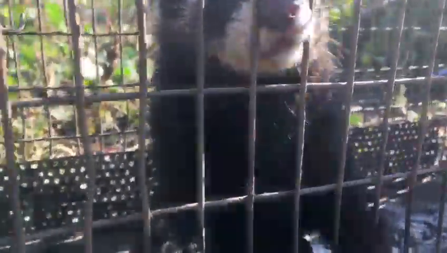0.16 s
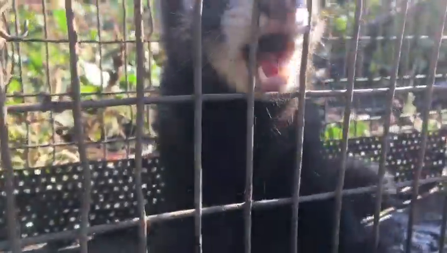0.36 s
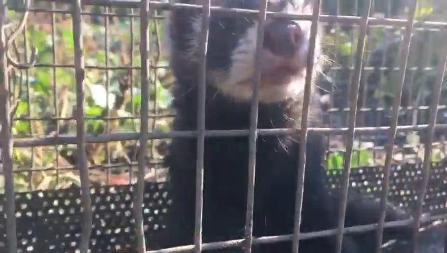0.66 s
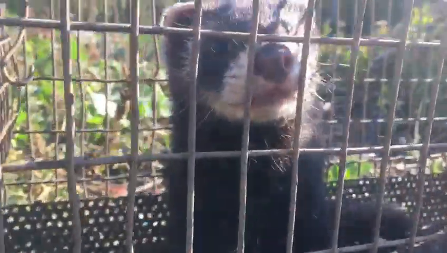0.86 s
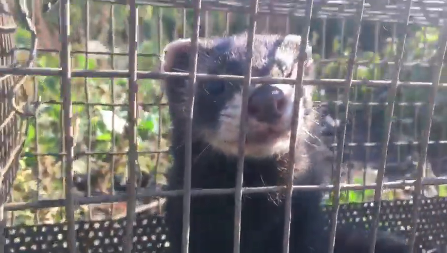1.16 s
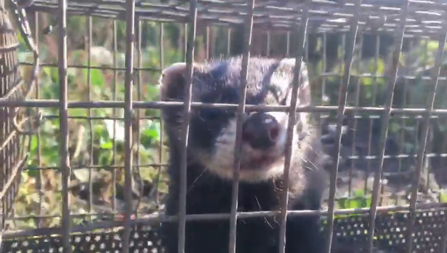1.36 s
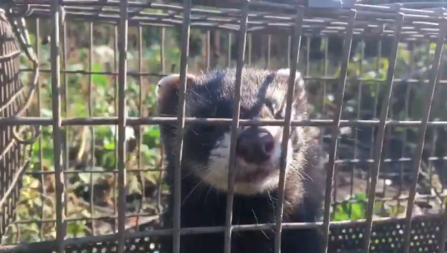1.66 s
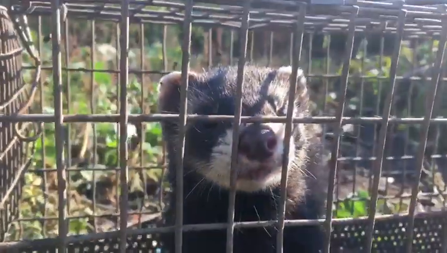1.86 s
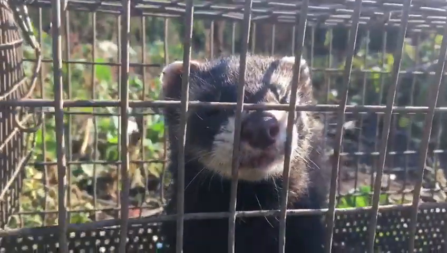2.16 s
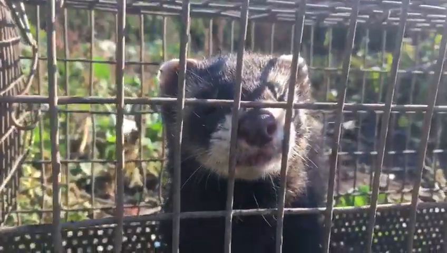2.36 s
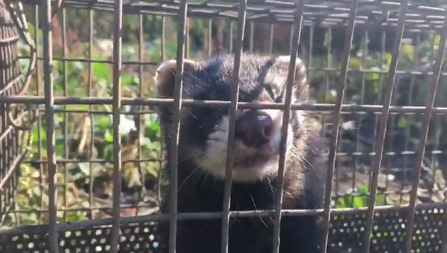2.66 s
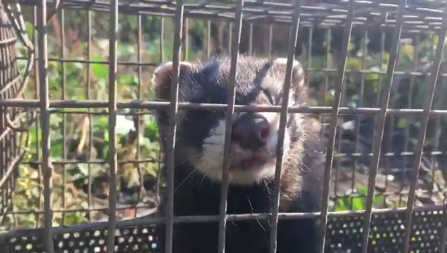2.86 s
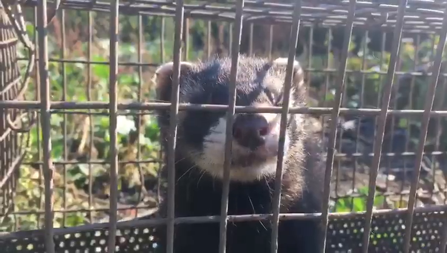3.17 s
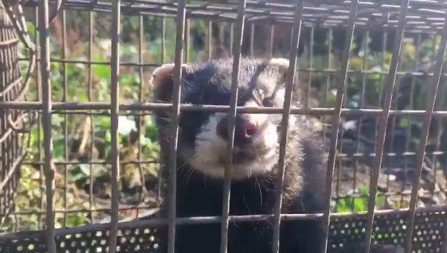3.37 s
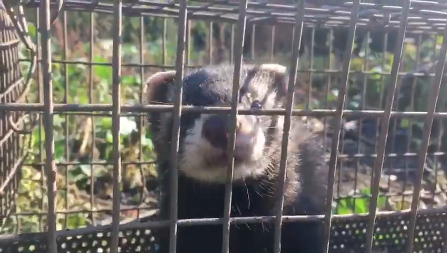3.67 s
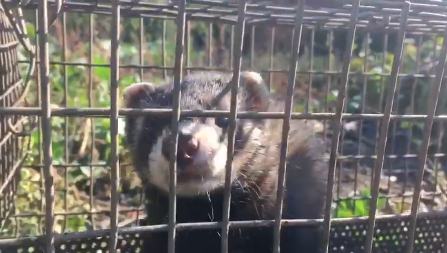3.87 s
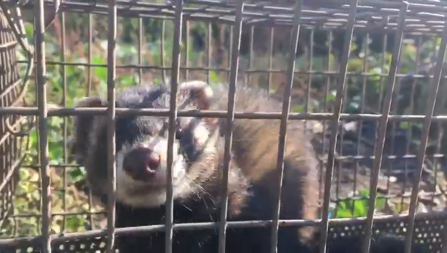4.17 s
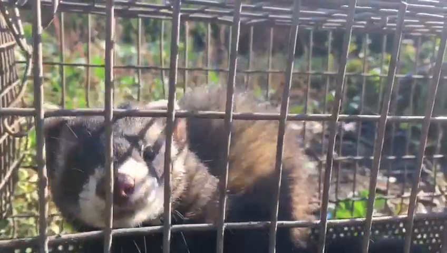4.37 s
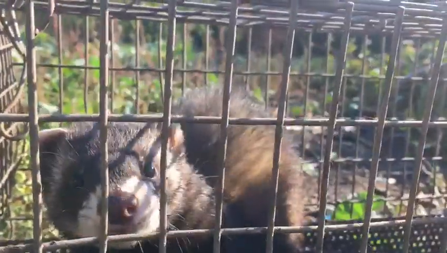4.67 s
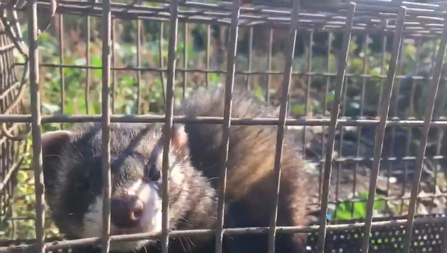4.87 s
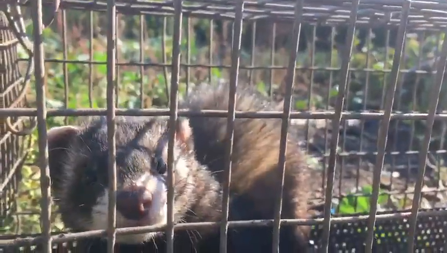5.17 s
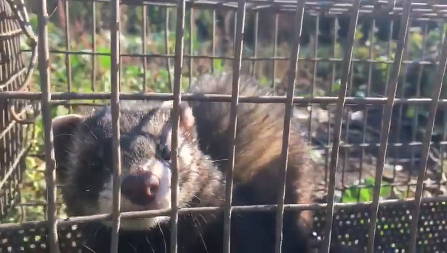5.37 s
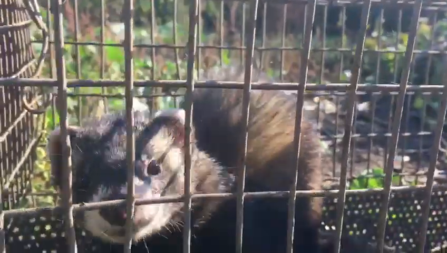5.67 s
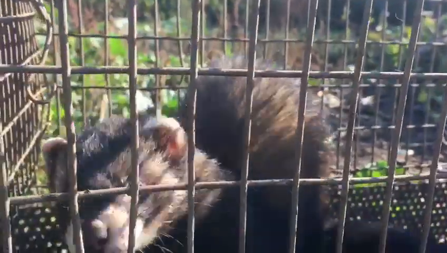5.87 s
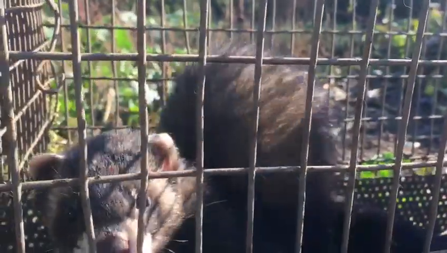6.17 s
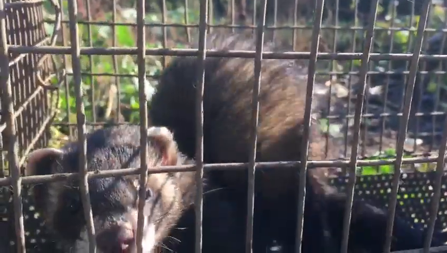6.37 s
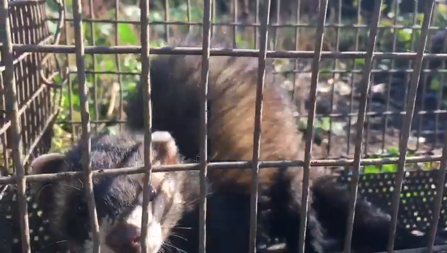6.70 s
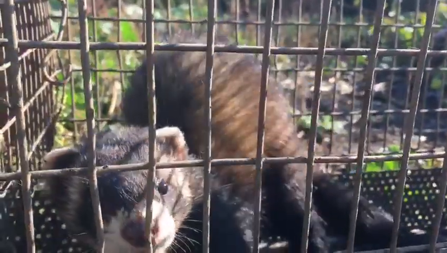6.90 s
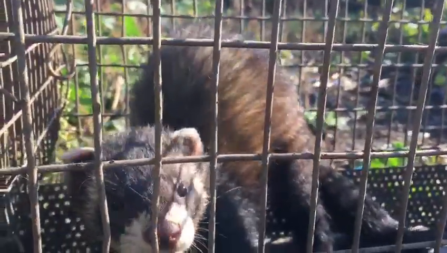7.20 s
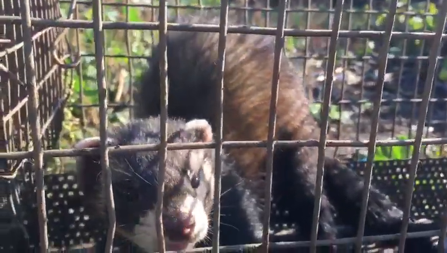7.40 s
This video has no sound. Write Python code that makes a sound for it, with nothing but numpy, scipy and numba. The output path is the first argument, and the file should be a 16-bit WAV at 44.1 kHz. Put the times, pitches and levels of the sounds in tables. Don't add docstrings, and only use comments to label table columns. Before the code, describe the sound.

Claws tick on mesh, two explosive spits burst near the microphone, far dogs woof and whine across a yard, and a long steady hiss ends it.

```python
import sys
import numpy as np
from scipy import signal
from scipy.fft import rfft, irfft
from scipy.io import wavfile
from scipy.ndimage import map_coordinates
from numba import njit

SR = 44100
rng = np.random.default_rng(int(sys.argv[2]) if len(sys.argv) > 2 else 0)


def materialize(psi):
    bounded = np.clip(np.atleast_2d(psi).T, -1, 1)
    quanta = np.round(bounded * 32767).astype(np.int16)
    wavfile.write(sys.argv[1], SR, quanta)


def linear_from_db(decibels):
    return 10 ** (np.asarray(decibels, float) / 20)


N = 332514

# f/Hz, density/dB
WIND_SPECTRUM = [(8.8, -52.5), (15, -24), (36, -5), (75, -2), (237, -5.5), (286, -10), (327, -34.5),
                 (500, -26.5), (650, -55), (1100, -120)]
HUM_SPECTRUM = [(120, -29), (200, -10), (264, -12), (332, -11.5), (540, -12.5), (752, -19), (1540, -24),
                (2220, -29), (11000, -32.5), (12900, -47), (16800, -78), (22000, -120)]
WIND_DB, HUM_DB = -60.5, -77.5
# peak t/s, rise/s, fade/s, level/dB
GUSTS = [
    (.4, 0.19, 0.149, -49.5),
    (1.59, 0.27, 0.21, -71),
    (2.052, .8, 0.64, -57.5),
    (4.3, 1.5, 1.26, -62.5),
    (4.66, 0.56, 0.31, -62),
    (5.92, 1.5, 1.2, -71),
]
# peak t/s, rise/s, fade/s, level/dB
RUSTLE = [
    (0.2356, 0.18, 0.16, -62),
]
DUCK_FROM_S, DUCKED_S, BACK_S = 0.35, 0.72, 1.99
WIND_DUCK_DB, HUM_DUCK_DB = -29.5, -13

# t/s, length/s, from f/Hz, to f/Hz, level/dB
CHIRPS = [
    (2.24, 0.032, 3370, 1935, -44.5),
    (2.324, 0.024, 3210, 2595, -62),
    (2.756, 0.021, 3394, 3130, -64),
    (4.709, 0.024, 3105, 2374, -47),
    (4.786, 0.026, 3100, 2560, -54),
]

# top t/s, rise/s, top f/Hz, level/dB, octave against it/dB
WOOFS = [
    (2.904, 0.071, 564, -28.5, -19.5),
    (3.126, 0.09, 565.6, -29, -19.5),
    (3.372, 0.086, 528, -26.5, -20.5),
    (3.638, 0.086, 518, -26.5, -18.5),
    (5.155, 0.081, 512.5, -29, -16.5),
]
GRUMBLES = [
    (1.95, .06, 533, -42.5, -15),
    (5.94, .06, 518, -37.5, -19.5),
    (6.216, 0.077, 515.7, -47.5, -9),
    (6.886, 0.092, 505.4, -39.5, -20),
    (7.455, 0.14, 497.4, -40.5, -15),
]
YAPS = [
    (1.858, 0.041, 368.5, -45, -8.5),
    (2.172, 0.098, 566.5, -39, -17),
    (5.422, 0.067, 426.8, -36, -14.5),
    (5.686, .056, 437.5, -43.5, -11.5),
    (7.188, 0.082, 411, -46.5, -14),
]
WHOOPS = [
    (1.05, 0.043, 487.7, -47.5, -4),
    (3.945, .062, 506.6, -35.5, -5.5),
    (4.675, 0.08, 408.5, -35.5, -11.5),
    (6.692, .055, 523, -28, -13),
]
WOOF = dict(climb=11, sag=22, hold_s=0, fall_s=0.11, catch_db=-46.5, leave_db=-56.5, early_db=-5,
            late_db=-15, rough_db=2, tilt_db=-9, half_db=-15, breath_db=-16.5, echo_db=0)
GRUMBLE = dict(climb=7.8, sag=15, hold_s=0, fall_s=0.11, catch_db=-42.5, leave_db=-51, early_db=-9.5,
               late_db=-30.5, rough_db=4, tilt_db=-9, half_db=-14, breath_db=-15, echo_db=4)
YAP = dict(climb=9.9, sag=2.94, hold_s=0, fall_s=0.0765, catch_db=-53.5, leave_db=-53.5, early_db=-2,
           late_db=-7, rough_db=4, tilt_db=-7.5, half_db=-18, breath_db=-17, echo_db=4.5)
WHOOP = dict(climb=18, sag=2.5, hold_s=0.06, fall_s=0.039, catch_db=-40.5, leave_db=-69, early_db=-11,
             late_db=-12, rough_db=2.4, tilt_db=-7, half_db=-18, breath_db=-27.5, echo_db=-8)
CATCH_BELOW_TOP_DB = -8
# t/s, length/s, from
# f/Hz, to f/Hz, level/dB
WHIMPERS = [(1.055, 0.097, 770.5, 702, -46.5), (1.13, 0.085, 500, 472, -54), (1.552, 0.085, 165, 293, -46),
            (1.643, 0.18, 269.7, 216.6, -54), (2.0, 0.11, 168.6, 216.4, -46),
            (2.27, .09, 150.7, 180.6, -53), (2.507, 0.093, 299, 331, -43), (2.587, 0.11, 313, 351, -48.5),
            (2.687, 0.055, 256.6, 143.5, -52.5), (2.98, 0.062, 201, 196.6, -51),
            (3.22, 0.069, 201.3, 210.4, -51.5), (3.47, 0.06, 189.6, 187, -50.5),
            (3.9, 0.064, 553, 656, -30), (3.97, 0.1, 800, 724, -39.5), (4.658, 0.1, 549.5, 569, -33),
            (5.11, 0.13, 856, 898, -47), (5.25, 0.076, 186.6, 188, -49.5),
            (5.512, 0.172, 189.8, 213.7, -49.5), (5.678, 0.15, 213.4, 229.5, -41.5),
            (5.844, 0.083, 232.7, 305, -41.5), (5.951, 0.084, 152.2, 165, -49),
            (6.312, 0.3, 266, 258, -56.5), (6.66, 0.042, 686, 723, -24)]
WHIMPER_TOP = 0.35
WHIMPER_CATCH_DB, WHIMPER_LEAVE_DB, WHIMPER_OCTAVE_DB = -5, -8, -14
# f/Hz, level/dB
DOG_THROAT = [(150, 30), (400, 7), (560, 8.5), (750, -2), (1100, -8.5), (1600, -9), (2100, -18),
              (2700, -10), (3600, -23.5), (4500, -69)]
# f/Hz, density/dB
DOG_BREATH = [(410, -22), (700, -38), (849, 4), (1230, -30.5), (1500, -11), (2150, -26.5), (2670, -15),
              (4330, -36), (4880, -38.5), (6060, -22.5), (8600, -32), (11200, -35), (12500, -60),
              (16200, -92), (22000, -120)]
# delay t/s, level/dB
WALL_ECHOES = [
    (.047, -13.5),
    (.083, -13.5),
    (.125, -42),
]
YARD_T60_S, YARD_DB = 0.5, -8.5

# peak t/s, rise/s, fade/s, low scrape level/dB, bright scrape level/dB
DRAGS = [
    (.108, 0.065, 0.029, -57, -73),
    (.2, 0.05, 0.082, -51.5, -55.5),
    (0.247, 0.037, 0.18, -31.5, -37),
    (0.45, 0.061, 0.0065, -54, -41.5),
]
# f/Hz, density/dB
SCRAPE_SPECTRUM = [(88, -38.5), (150, -9), (319, -1.5), (403, -13.5), (524, -3.5), (1450, -2), (4000, -13),
                   (5200, -46.5), (8800, -120)]
# peak t/s, rise/s, fade/s, level/dB
BRUSHES = [
    (2.254, .25, 0.25, -63),
    (4.02, 0.19, .25, -53),
    (4.452, 0.13, 0.107, -63),
    (4.724, 0.11, 0.21, -53),
    (5.122, 0.06, 0.11, -63.5),
    (5.906, .025, 0.43, -74),
]
# f/Hz, density/dB
BRUSH_SPECTRUM = [(880, -11), (1500, 1), (3080, -3.5), (4120, -16.5), (11200, -16.5), (12500, -36),
                  (16200, -69), (22000, -120)]
# t/s, peak level/dB
CLAWS = [(0.0954, -38.5), (0.1507, -22), (0.1822, -32), (0.1939, -22), (0.226, -19.5), (2.252, -45),
         (2.3294, -55), (4.34, -48), (4.4327, -43.5), (5.91, -39.5), (6.1405, -52.5)]
# f/Hz, level/dB, decay time T60/s
WIRE_MODES = [(3670, -29, 0.08), (6150, -10.5, 0.11), (8750, -9, 0.064), (8940, -4, 0.0043),
              (9600, -22, 0.021)]

# t/s, level/dB
GASP = [
    (6.17, -72),
    (6.195, -56.5),
    (6.235, -47),
    (6.275, -51.5),
    (6.293, -75),
]
# f/Hz, density/dB
GASP_SPECTRUM = [(710, -39), (1200, -10), (1880, 5), (2200, -2.5), (3930, -0.5), (4830, -21), (5700, 4),
                 (8870, -10), (9780, -4), (11700, -17), (12500, -57.5), (16200, -84), (22000, -120)]
# t/s, level/dB
HISS = [
    (6.3, -71),
    (6.316, -47.5),
    (6.45, -37.5),
    (7.54, -37),
]
# f/Hz, density/dB
HISS_SPECTRUM = [(410, -39), (700, -30), (780, -6.5), (1370, -5.5), (1590, -2), (2090, -12), (2690, -6),
                 (3040, 5), (3510, -9.5), (4100, 5), (5150, -27.5), (5950, -19.5), (6960, -56),
                 (9180, -15.5), (12400, -41), (16100, -69), (22000, -120)]
HISS_TOP_HZ, HISS_SINK_HZ_PER_S, HISS_TOP_DB = 9270, 380, -8

# t/s, hold/s, fade/s, mouth level/dB, teeth against the mouth level/dB
SPITS = [
    (0.393, 0.046, .01, -65.5, -9),
    (0.447, 0.012, 0.0068, -33, -2.5),
    (.458, 0.0054, .006, -25.5, 5),
    (.468, .048, 0.024, -8, -5.5),
    (0.563, 0.069, 0.021, -64, -2),
    (0.626, 0.0049, .006, -38, 6),
    (0.633, 0.021, 0.018, -21, -1.5),
    (0.697, 0.03, 0.092, -61.5, -9),
]
SPIT_ATTACK_S = 0.0022
# t/s, f/Hz
MOUTH = [
    (.44, 2520),
    (.467, 2710),
    (.507, 2290),
    (.62, 2360),
    (.655, 2350),
    (.68, 2105),
    (.82, 2300),
]
# f/Hz, density/dB
TEETH_SPECTRUM = [(350, -59.5), (600, -30), (1070, -13), (1760, -19.5), (2370, -9.5), (3310, -16),
                  (3760, -7), (4920, -16.5), (6300, -6.5), (7700, -14.5), (10200, -11.5), (11600, -15.5),
                  (12900, -63), (16800, -95), (22000, -120)]
# peak t/s, rise/s, fade/s, level/dB
THUMP = [
    (.478, .002, .045, -13.5),
]
THUMP_FROM_HZ, THUMP_TO_HZ, THUMP_DROP_S = 850, 75, 0.0044
# peak t/s, rise/s, fade/s, level/dB
PUFF = [
    (.49, 0.017, .055, -17),
]

CUTOFF_HZ, FLAT_HZ = 12050, 11500


def rms_one(x):
    return x / np.sqrt(np.mean(x ** 2) + 1e-20)


def band(x, low_hz, high_hz):
    return signal.sosfilt(signal.butter(2, [low_hz, high_hz], "band", fs=SR, output="sos"), x)


def at_hz(points, hz):
    point_hz, level_db = np.transpose(points)
    return np.interp(np.log(hz + 1), np.log(point_hz), level_db)


def in_time(rows):
    s, *columns = np.transpose(rows)
    t = np.arange(N) / SR
    gate = np.clip(np.minimum(t - s[0], s[-1] - t) / 0.005 + 1, 0, 1)
    return [gate] + [np.interp(t, s, c) for c in columns]


def swell(s, rise_s, fade_s, level_db, hold_s=0):
    t = np.arange(N) / SR - s
    away = np.maximum(-t / rise_s, (t - hold_s) / fade_s)
    return linear_from_db(level_db - 30 * np.clip(away, 0, 5))


def coloured(x, spectrum, low_hz, high_hz):
    hz = np.arange(N // 2 + 1) * SR / N
    shaped = rfft(x) * linear_from_db(at_hz(spectrum, np.minimum(hz, FLAT_HZ)))
    inside = irfft(shaped * (hz > low_hz) * (hz < high_hz), N)
    return irfft(shaped, N) / np.std(inside)


def flutter(rate_hz, depth_db):
    r = np.exp(-2 * np.pi * rate_hz / SR)
    noise = rng.standard_normal(N + SR)
    slow = signal.lfilter([1], [1, -2 * r, r * r], noise)[SR:]
    return rms_one(linear_from_db(depth_db * rms_one(slow)))


def air(rate_hz, depth_db):
    return rng.standard_normal(N) * flutter(rate_hz, depth_db)


@njit
def moving_resonance(x, hz, r, sr):
    y = np.zeros_like(x)
    for i in range(2, len(x)):
        drive = (1 - r * r) / 2 * (x[i] - x[i - 2])
        y[i] = drive + 2 * r * np.cos(2 * np.pi * hz[i] / sr) * y[i - 1] - r * r * y[i - 2]
    return y


def mouth(x, hz, width_hz):
    return rms_one(moving_resonance(x, hz, np.exp(-np.pi * width_hz / SR), SR))


def background():
    duck = np.interp(np.arange(N) / SR, [DUCK_FROM_S, DUCKED_S, BACK_S], [0, 1, 0])
    wind_gain = linear_from_db(WIND_DB + WIND_DUCK_DB * duck) + sum(swell(*row) for row in GUSTS)
    hum_gain = linear_from_db(HUM_DB + HUM_DUCK_DB * duck) + swell(*RUSTLE[0])
    wind = wind_gain * coloured(air(26, 2.3), WIND_SPECTRUM, 25, 140)
    hum = hum_gain * coloured(air(8, 1.2), HUM_SPECTRUM, 5000, 8000)
    return wind + hum


def bird():
    out = np.zeros(N)
    for s, length, from_hz, to_hz, level_db in CHIRPS:
        hz = from_hz + (to_hz - from_hz) * np.linspace(0, 1, round(length * SR)) ** 2
        whistle = np.sin(2 * np.pi * np.cumsum(hz) / SR)
        out[round(s * SR):][:len(hz)] += linear_from_db(level_db) * np.hanning(len(hz)) * whistle
    return out


def bark(s, rise_s, hz, level_db, octave_db, kind):
    octave_db = octave_db + level_db
    hold_s, fall_s = kind["hold_s"], kind["fall_s"]
    catch_db = min(kind["catch_db"], level_db + CATCH_BELOW_TOP_DB)
    start = (s - rise_s, hz * 2 ** (-kind["climb"] * rise_s), catch_db, octave_db + kind["early_db"])
    top = [(at, hz, level_db, octave_db) for at in sorted({s, s + hold_s})]
    end = (s + hold_s + fall_s, hz * 2 ** (-kind["sag"] * fall_s), kind["leave_db"],
           octave_db + kind["late_db"])
    return [start, *top, end]


def whimper(s, length, from_hz, to_hz, level_db):
    shape = [(0, WHIMPER_CATCH_DB), (WHIMPER_TOP, 0), (1, WHIMPER_LEAVE_DB)]
    return [(s + share * length, from_hz + share * (to_hz - from_hz), level_db + db,
             level_db + db + WHIMPER_OCTAVE_DB) for share, db in shape]


def arched(rows, span):
    s, *columns = np.transpose(rows)
    t = np.arange(span.start, min(span.stop, N)) / SR
    place = np.interp(t, s, np.arange(len(s)))
    return [map_coordinates(c, [place], order=2, mode="nearest") for c in columns]


def call(chance, rows, tilt_db, half_db, breath_db, rough_db):
    start_s, end_s = rows[0][0], rows[-1][0]
    span = slice(round(start_s * SR) - 400, round(end_s * SR) + 400)
    t = np.arange(span.start, min(span.stop, N)) / SR
    gate = np.clip(np.minimum(t - start_s, end_s - t) / 0.008 + 1, 0, 1)
    hz, first_db, second_db = arched(rows, span)
    breath, jitter, shimmer = chance[:, span]
    phase = 2 * np.pi * np.cumsum(hz * linear_from_db(0.09 * rough_db * jitter)) / SR
    order = np.arange(2, 25)[:, None] / 2
    partial_db = second_db + at_hz(DOG_THROAT, order * hz) - at_hz(DOG_THROAT, 2 * hz)
    partial_db += tilt_db * np.log2(order / 2)
    partial_db += half_db * (order % 1 > 0)
    wavering = np.array([0.3 * rough_db * np.roll(shimmer, 331 * k) for k in range(len(order))])
    partial_db += 6 * np.tanh(wavering)
    partial_db[0] = first_db
    voiced = np.sqrt(2) * np.sum(linear_from_db(partial_db) * np.sin(order * phase), axis=0)
    breath_gain = linear_from_db(0.42 * first_db + 0.66 * second_db + breath_db)
    puffs = breath_gain * breath * (1 + 0.89 * np.sin(phase))
    return span, gate * (voiced * linear_from_db(rough_db * shimmer) + puffs)


def dogs():
    breath = coloured(air(67, 2.8), DOG_BREATH, 1330, 12000)
    jitter = rms_one(flutter(60, 1) - 1)
    shimmer = rms_one(flutter(50, 1) - 1)
    chance = np.array([breath, jitter, shimmer])
    out = np.zeros((2, N))
    for table, kind in [(WOOFS, WOOF), (GRUMBLES, GRUMBLE), (YAPS, YAP), (WHOOPS, WHOOP)]:
        for row in table:
            span, sound = call(chance, bark(*row, kind), kind["tilt_db"], kind["half_db"],
                               kind["breath_db"], kind["rough_db"])
            out[:, span] += sound * linear_from_db([[0], [kind["echo_db"]]])
    for row in WHIMPERS:
        span, sound = call(chance, whimper(*row), tilt_db=-14, half_db=-14, breath_db=-30, rough_db=3.8)
        out[:, span] += sound * linear_from_db([[0], [-4.5]])
    return out


def yard(x):
    t = np.arange(SR) / SR
    tail = rng.standard_normal(SR) * linear_from_db(-60 * t / YARD_T60_S) * np.clip(t / 0.0084, 0, 1)
    response = linear_from_db(YARD_DB) * tail / np.sqrt(np.sum(tail ** 2))
    for delay, level_db in WALL_ECHOES:
        response[round(delay * SR)] += linear_from_db(level_db)
    return band(signal.fftconvolve(x, response)[:N], 233, 6000)


def paws():
    grains = air(400, 1.0)
    low_gain = sum(swell(s, rise, fade, low_db) for s, rise, fade, low_db, _ in DRAGS)
    bright_gain = sum(swell(s, rise, fade, bright_db) for s, rise, fade, _, bright_db in DRAGS)
    brush_gain = linear_from_db(-3.0) * sum(swell(*row) for row in BRUSHES)
    out = low_gain * coloured(grains, SCRAPE_SPECTRUM, 280, 3400)
    out += bright_gain * rms_one(band(grains, 3500, 13000))
    return out + brush_gain * coloured(grains, BRUSH_SPECTRUM, 3130, 11000)


def claws():
    clicks = np.zeros(N)
    clicks[[round(s * SR) for s, db in CLAWS]] = linear_from_db(np.array(CLAWS)[:, 1])
    skid_gain = signal.lfilter([1], [1, -linear_from_db(-60 / (0.062 * SR))], clicks + 1e-18)
    skid = skid_gain * rng.standard_normal(N)
    out = linear_from_db(-18.5) * band(skid, 670, 9900)
    for hz, level_db, t60 in WIRE_MODES:
        r = linear_from_db(-60 / (0.41 * t60 * SR))
        w = 2 * np.pi * hz / SR
        ringing = signal.lfilter([0, np.sin(w)], [1, -2 * r * np.cos(w), r * r], skid)
        out += linear_from_db(level_db - 27.0) * ringing
    return out


def hiss():
    gate, level_db = in_time(GASP)
    gasp = gate * linear_from_db(level_db) * coloured(air(67, 1.5), GASP_SPECTRUM, 5450, 12500)
    gate, level_db = in_time(HISS)
    top_hz = HISS_TOP_HZ - HISS_SINK_HZ_PER_S * (np.arange(N) / SR - HISS[0][0])
    flow = air(180, 1.1)
    body = coloured(flow, HISS_SPECTRUM, 2974, 4800)
    body += linear_from_db(HISS_TOP_DB - 4.5) * mouth(flow, top_hz, 340)
    return gasp + gate * linear_from_db(level_db) * body


def thump():
    since = np.clip(np.arange(N) / SR - THUMP[0][0], 0, 1)
    hz = THUMP_TO_HZ + THUMP_FROM_HZ * np.exp(-since / THUMP_DROP_S)
    knock = swell(*THUMP[0]) * np.sin(2 * np.pi * np.cumsum(hz * (since > 0)) / SR)
    return knock + swell(*PUFF[0]) * rms_one(band(air(40, 7.5), 47, 130))


def spits():
    blast = air(90, 1.9)
    mouth_hz = in_time(MOUTH)[1]
    ring = linear_from_db(-2.5) * mouth(blast, mouth_hz, 210)
    spray = coloured(blast, TEETH_SPECTRUM, 4000, 11000)
    out = np.zeros(N)
    for s, hold_s, fade_s, level_db, teeth_db in SPITS:
        gain = swell(s, SPIT_ATTACK_S, fade_s, level_db, hold_s)
        out += gain * (ring + linear_from_db(teeth_db) * spray)
    return out + thump()


def scene():
    straight, to_walls = dogs() + bird()
    far = straight + yard(to_walls)
    animal = paws() + claws() + hiss() + spits()
    return (background() + far + animal)[None]


def band_limit(x):
    return signal.sosfilt(signal.butter(12, 13040, fs=SR, output="sos"), x)


def record(dry):
    rounded = 0.85 * np.tanh(dry / 0.85)
    steep = signal.ellip(10, 0.5, 70, CUTOFF_HZ, fs=SR, output="sos")
    mix = signal.sosfilt(steep, rounded)
    return band_limit(mix)


dry = scene()
out = record(dry)
materialize(out)
```